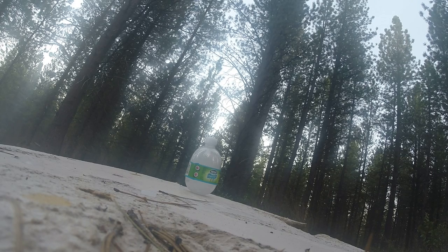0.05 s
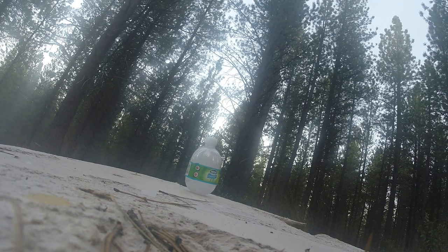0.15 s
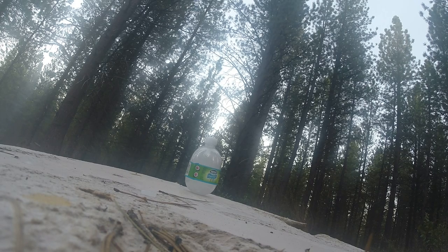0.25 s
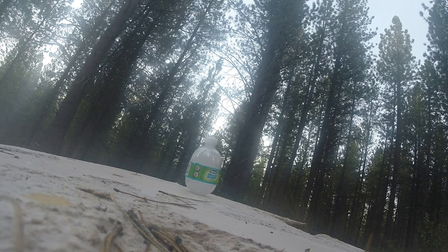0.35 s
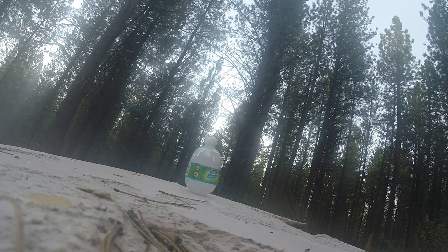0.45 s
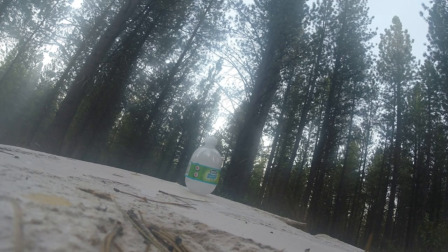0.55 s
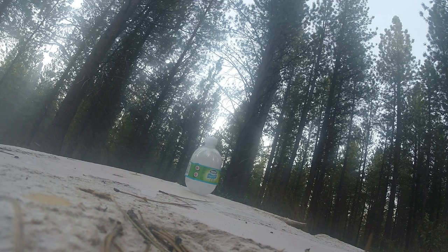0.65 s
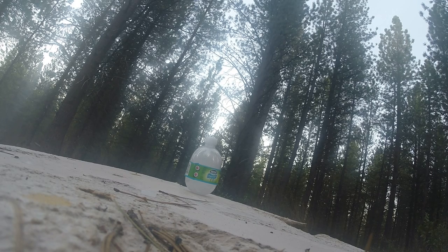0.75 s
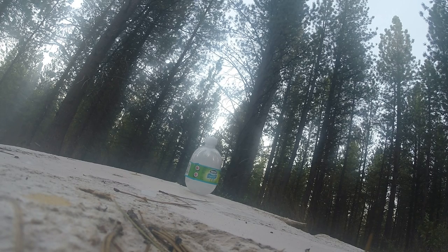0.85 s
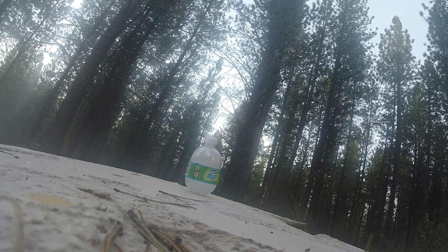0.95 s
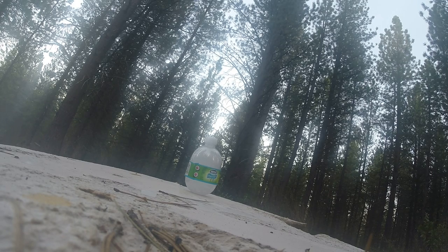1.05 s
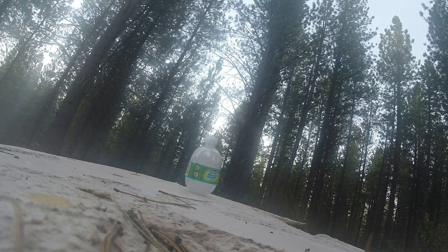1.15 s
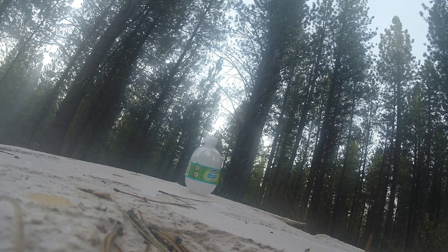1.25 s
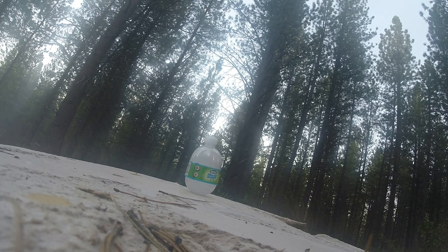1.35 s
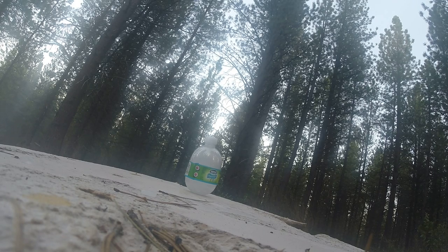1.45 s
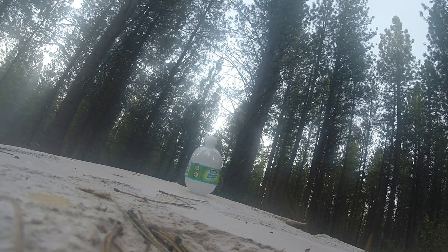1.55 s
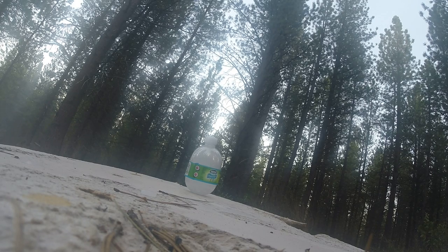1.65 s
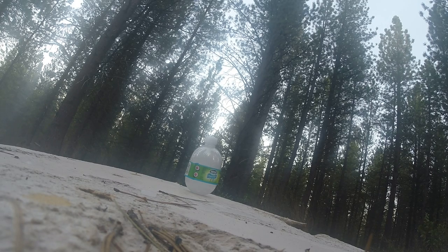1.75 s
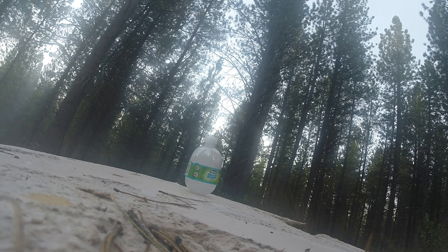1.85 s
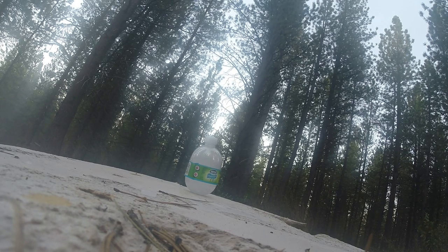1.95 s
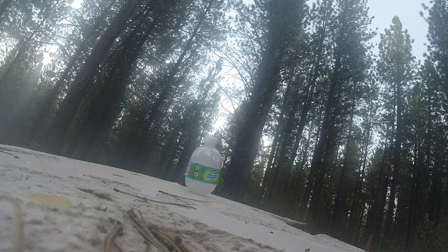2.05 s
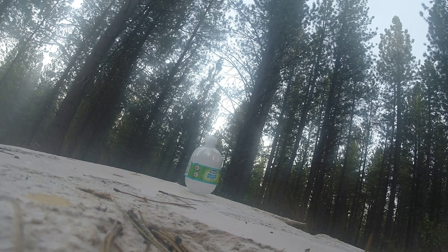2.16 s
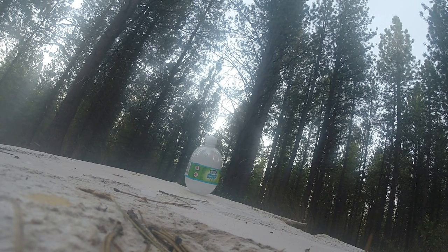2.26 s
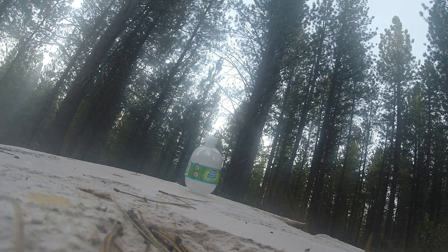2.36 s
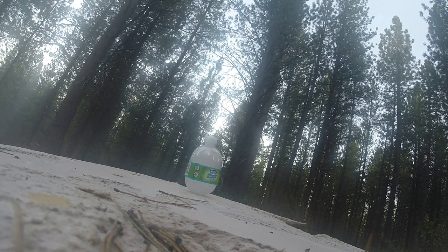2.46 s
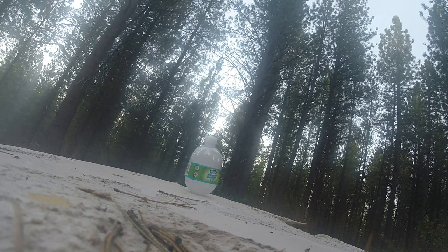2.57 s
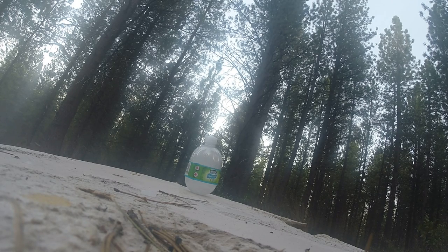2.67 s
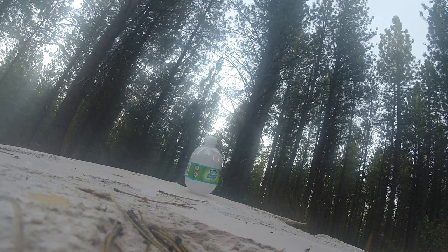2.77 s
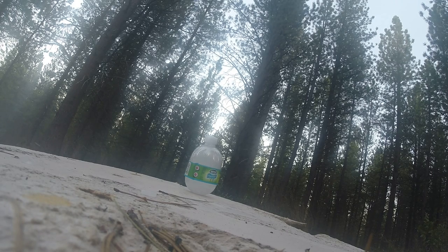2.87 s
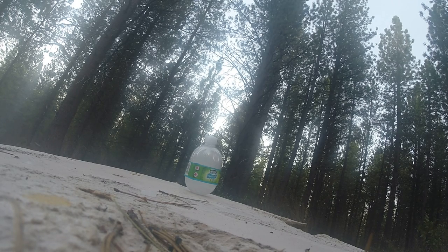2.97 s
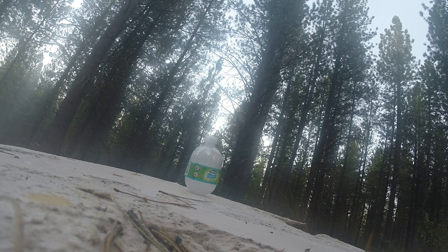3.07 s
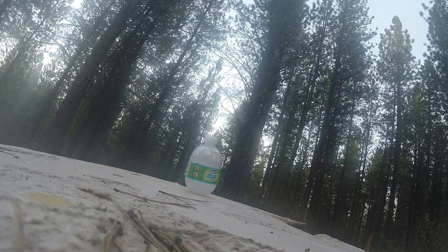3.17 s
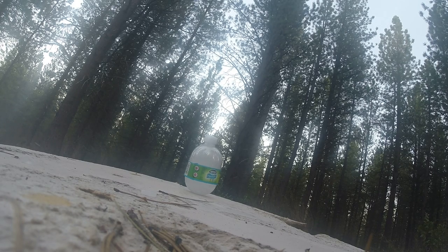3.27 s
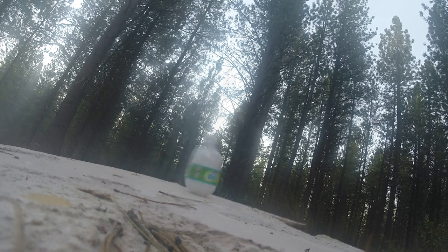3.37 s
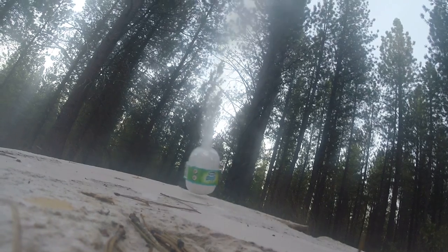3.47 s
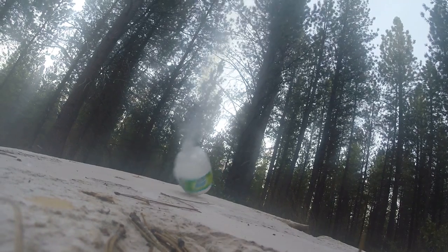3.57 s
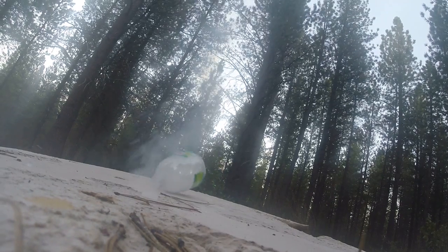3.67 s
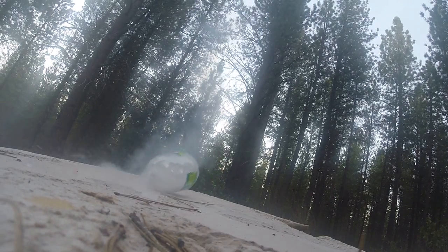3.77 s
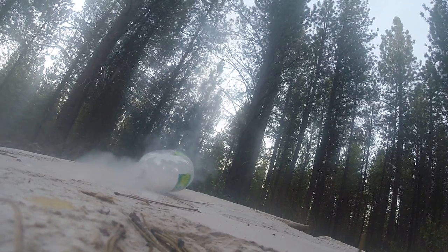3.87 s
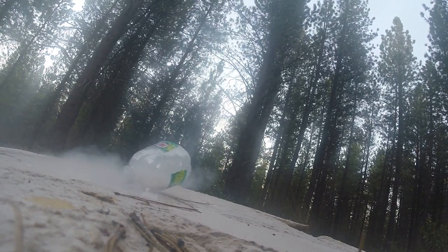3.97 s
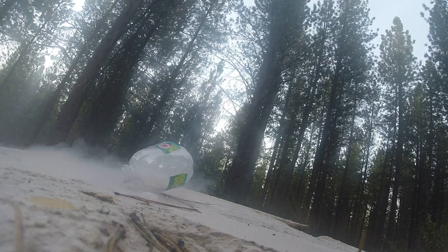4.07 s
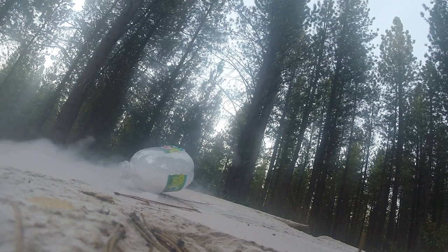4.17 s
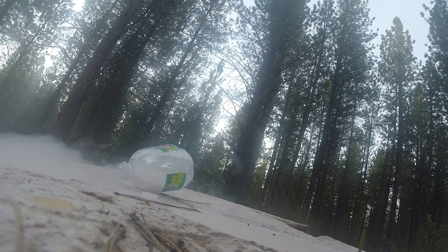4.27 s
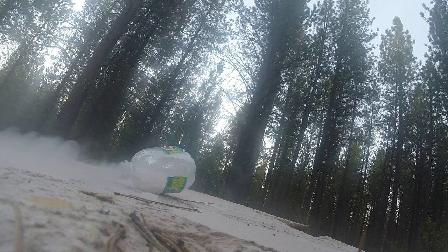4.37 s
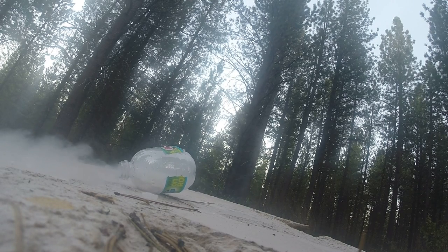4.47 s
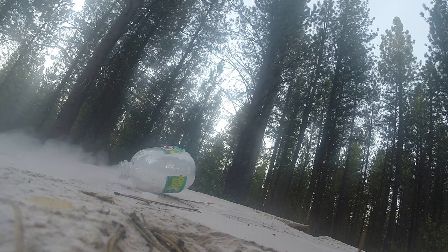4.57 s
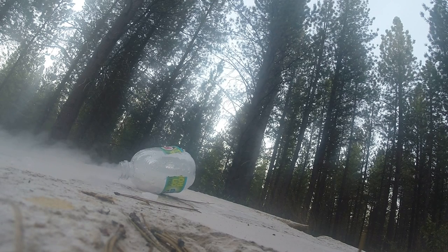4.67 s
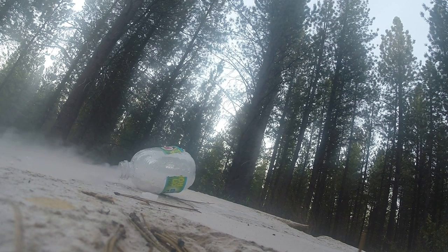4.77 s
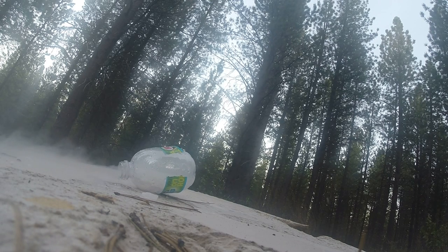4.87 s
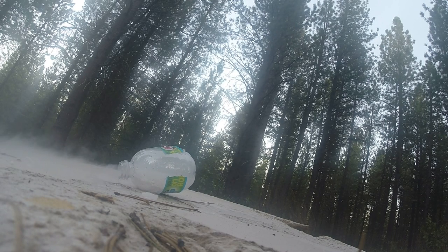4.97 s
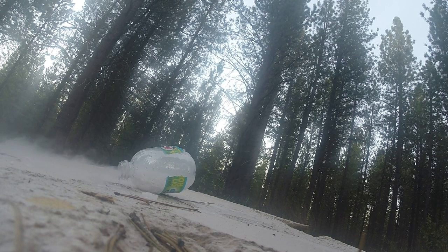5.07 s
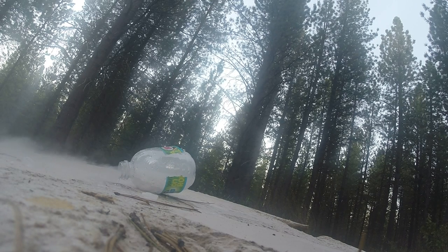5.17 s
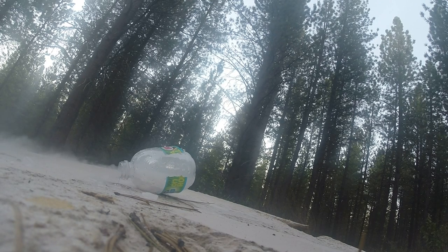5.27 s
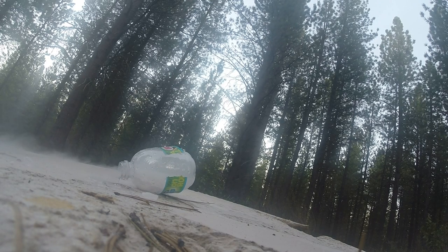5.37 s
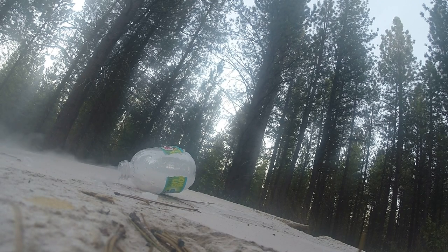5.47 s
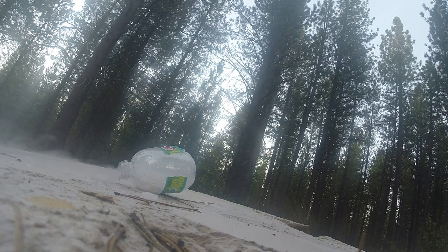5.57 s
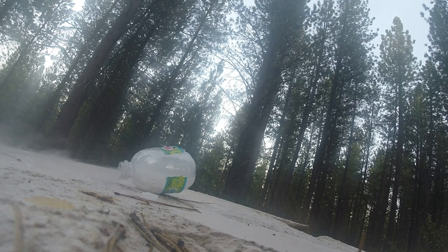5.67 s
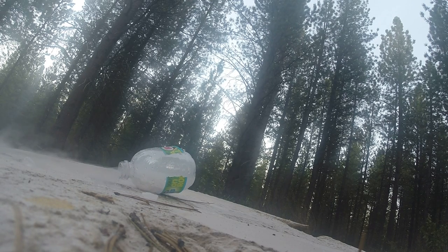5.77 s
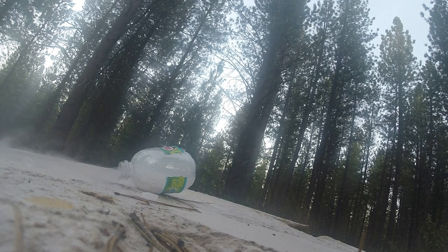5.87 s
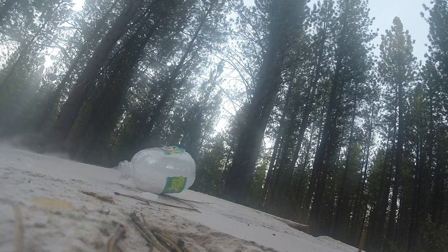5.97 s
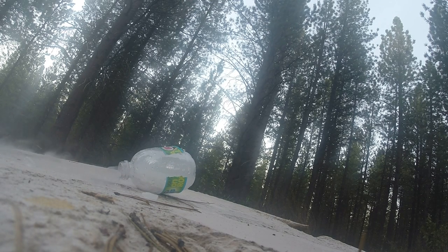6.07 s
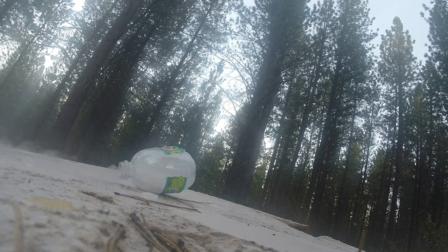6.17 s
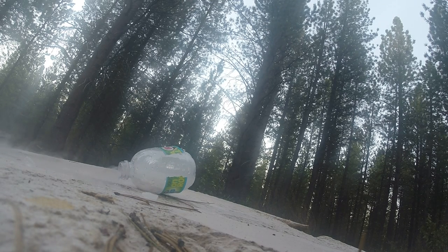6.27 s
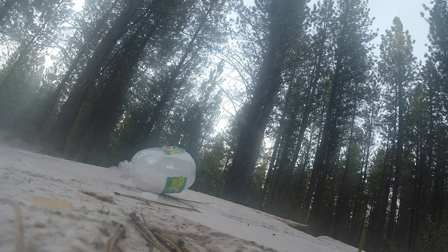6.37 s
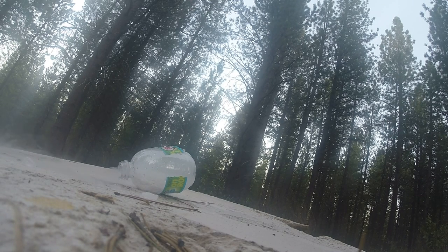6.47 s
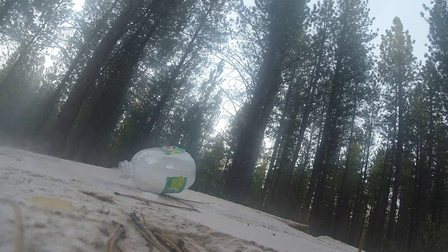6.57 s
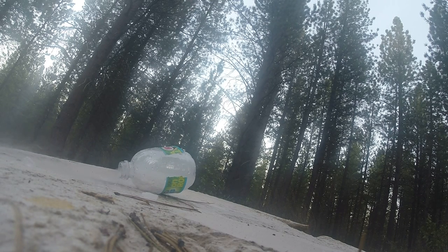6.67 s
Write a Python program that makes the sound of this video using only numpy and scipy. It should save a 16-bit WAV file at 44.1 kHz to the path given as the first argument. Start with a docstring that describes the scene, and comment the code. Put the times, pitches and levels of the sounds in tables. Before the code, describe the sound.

Quiet outdoor air with a very faint high electronic whine and distant single bird whistles. A pressurised bottle cracks and creaks at uneven intervals for over three seconds, then bursts its cap in a clipped bang. A brief roaring gas jet, a low hollow tumble and a lingering forest reverberation follow, with bright plastic snaps, knocks on rock and delicate fizz to the end.

```python
"""In a still pine forest, with a camera's thin whine and a far bird's whistles, a sealed bottle of dry ice stands on rock.
First its stretching wall slips: noise cracks and damped bottle modes. Then the cap blows off: a pressure step, ringing
gas and torn thread overload the microphone, turbulent noise rushes out, and the trees return a decaying noise tail.
The bottle topples and booms by its low modes while plastic knocks on rock as filtered clicks and hollow rings.
Last, the cold wall snaps in bright clicks and notes, and boiling gas fizzes as dense random grains over a fine hiss."""
import sys
import numpy as np
from scipy import signal
from scipy.fft import rfft, irfft
from scipy.io import wavfile
from scipy.ndimage import uniform_filter1d

SR = 44100
rng = np.random.default_rng(int(sys.argv[2]) if len(sys.argv) > 2 else 0)


def wav_record(signal):
    """Record a signal, one row per channel, as 16-bit PCM in the file named by sys.argv[1]."""
    frames = np.transpose(np.atleast_2d(signal))
    bounded = np.clip(frames, -1, 1)
    # unit amplitude maps onto the largest positive 16-bit level
    quanta = np.round(bounded * 32767).astype(np.int16)
    wavfile.write(sys.argv[1], SR, quanta)


N = 296352
T = np.arange(N) / SR  # scene time in s
HIT_T = np.arange(16384) / SR  # time since a blow in s
TOP_HZ = 15200  # upper limit of the microphone


def undb(db):
    """Decibels to amplitude gain."""
    return 10 ** (np.asarray(db) / 20)


def unit(x):
    """Normalise power: scale to rms 1."""
    return x / np.sqrt(np.mean(x ** 2))


def unit_hit(x):
    """Normalise energy: scale to that of 10 ms at rms 1."""
    return x / np.sqrt(np.sum(x ** 2) / (SR / 100))


def at_hz(points, hz):
    """Interpolate (Hz, value) points on a log-frequency axis."""
    f, value = np.transpose(points)
    return np.interp(np.log(hz + 1e-9), np.log(f), value)


def colour(x, points):
    """Spectral shaping: filter by (Hz, dB) points, falling away beyond both ends; rms 1."""
    hz = np.fft.rfftfreq(len(x), 1 / SR) + 1e-3
    low_skirt = np.minimum(hz / points[0][0], 1) ** 2
    high_skirt = np.minimum(points[-1][0] / hz, 1) ** 2
    gain = undb(at_hz(points, hz)) * low_skirt * high_skirt
    return unit(irfft(rfft(x) * gain, len(x)))


def bandpass(x, low_hz, high_hz):
    """Causal Butterworth band-pass."""
    edges = [low_hz, min(high_hz, .45 * SR)]
    return signal.sosfilt(signal.butter(2, edges, "band", fs=SR, output="sos"), x)


def decay(t, t60):
    """Exponential damping: 60 dB down after t60 seconds."""
    return np.exp(-np.log(1000) * t / t60)


def fading(x, t60_at):
    """Frequency-dependent damping: each octave of x dies away at its own rate."""
    t, spectrum = np.arange(len(x)) / SR, rfft(x)
    octave = np.clip(np.log2(np.fft.rfftfreq(len(x), 1 / SR) + 1), 7, 14)
    out = 0
    for k in range(7, 15):  # overlapping bands centred on 2^k Hz
        band = irfft(spectrum * np.maximum(1 - abs(octave - k), 0), len(x))
        out = out + band * decay(t, t60_at(2. ** k))
    return out


def ring(modes, detune, scatter_db=0):
    """Modal synthesis: a sum of damped sines, slightly different at each blow."""
    out = 0
    for hz, db, t60 in modes:
        sharp, louder = rng.standard_normal(2)
        gain = undb(db + scatter_db * louder)
        tone = np.sin(2 * np.pi * hz * (1 + detune * sharp) * HIT_T)
        out = out + gain * tone * decay(HIT_T, t60)
    return out


def crack(points, t60, damping, treble_db=0):
    """High modal density: coloured noise, t60 set at 2 kHz, with high frequencies dying first."""
    # the treble gain grows from 3.5 kHz to its full value at 7 kHz
    tilted = [(hz, db + treble_db * np.clip(np.log2(hz / 3500), 0, 1)) for hz, db in points]
    noise = colour(rng.standard_normal(len(HIT_T)), tilted)
    return unit_hit(fading(noise, lambda hz: t60 * (2000 / hz) ** damping))


def walk(rate):
    """Random modulation: smoothed steps, rate per second, with a spread near 1."""
    k = int(SR / rate)
    steps = np.repeat(rng.standard_normal(N // k + 1), k)
    return unit(uniform_filter1d(steps, k)[:N])


def swell(t, peak_s, rise_db_per_s, fall_db_per_s):
    """Piecewise exponential envelope: linear in dB on each side of 0 dB at peak_s."""
    return np.where(t < peak_s, (t - peak_s) * rise_db_per_s, (peak_s - t) * fall_db_per_s)


def add(out, s, x):
    """Superposition: mix x into out from time s on."""
    i = int(s * SR)
    out[i:i + len(x)] += x[:N - i]


# Spectrum of the forest air. Each row: frequency in Hz, relative level in dB.
AIR_SPECTRUM = [(12, -38), (20, -7.5), (49, -1.5), (158, -5), (337, -11), (376, -9.5), (409, -10.5),
                (779, -15), (847, -14.5), (947, -17), (1610, -20), (4930, -27), (8380, -33.5), (13900, -41),
                (15900, -42.5)]
AIR_DB = -57
WHINE_HZ, WHINE_DB = 13908, -81.5


def background(waver_db=.2):
    """Stationary noise and a tone: still forest air and the camera's thin, slightly wandering whine."""
    air = colour(rng.standard_normal(N), AIR_SPECTRUM) * undb(AIR_DB + waver_db * walk(3.8))
    whine_hz = WHINE_HZ + 8 * walk(40)
    return air + undb(WHINE_DB) * np.sin(2 * np.pi * np.cumsum(whine_hz) / SR)


# A far bird's whistles. Each row: start in seconds, starting frequency in Hz, peak level in dB.
WHISTLES = [(1.11, 2745, -62), (2.19, 2760, -61), (3.36, 2770, -58), (4.585, 2825, -60), (5.76, 2810, -62)]
WHISTLE_S, WHISTLE_SAG_HZ = .078, 40


def bird():
    """Frequency modulation: soft, nearly pure tones whose pitch sags toward the end."""
    out = np.zeros(N)
    u = np.linspace(0, 1, int(WHISTLE_S * SR))
    envelope = np.sqrt(abs(np.sin(np.pi * u)))
    for s, start_hz, db in WHISTLES:
        hz = start_hz - WHISTLE_SAG_HZ * u ** 2
        add(out, s, undb(db) * np.sin(2 * np.pi * np.cumsum(hz) / SR) * envelope)
    return out


POP_S = 3.4523  # the cap lets go: echo, jet and pop all start here
# Spectrum the trees send back. Each row: frequency in Hz, relative level in dB.
ECHO_SPECTRUM = [(180, -46.5), (300, -33.5), (410, -12), (447, -9.5), (586, -7.5), (675, -10), (885, -7.5),
                 (1460, -20), (1880, -13.5), (2430, -27), (2840, -18), (3670, -16.5), (4950, -30),
                 (7070, -36), (9000, -45), (11700, -69), (19800, -120)]
# Reverberation times of the forest. Each row: frequency in Hz, t60 in seconds.
ECHO_T60 = [(300, 2.9), (600, 1.63), (1000, 5.17), (2000, 3), (4000, 1.3), (9000, 3.1)]


def forest_echo(db=-33, rise_s=0.29):
    """Diffuse scattering: countless trunks return the blast; air and ground leave the middle longest."""
    tail = fading(colour(rng.standard_normal(N), ECHO_SPECTRUM), lambda hz: at_hz(ECHO_T60, hz))
    build_up = 1 - np.exp(-(T / rise_s) ** 2)
    out = np.zeros(N)
    add(out, POP_S, tail * build_up * undb(db + .5 * walk(70.2)))
    return out


# Boiling of the dry ice. Each row: time in seconds, boiling level in dB (fizz and snaps add offsets).
BOILING = [(3.9, -67), (4.14, -66.5), (4.6, -70.5), (4.87, -59), (5.01, -67.5), (5.98, -60.5), (6.5, -69),
           (6.7, -72)]
BOIL_START_S, BOIL_ATTACK_S = 4.2, 0.49


def fizz_db(t):
    """Interpolated envelope: level of the boiling at time t."""
    return np.interp(t, *np.transpose(BOILING))


# Spectrum of the fizzing gas. Each row: frequency in Hz, relative level in dB.
FIZZ_SPECTRUM = [(700, 9), (1500, -1.5), (2800, -5), (6000, -9.5), (9000, -12), (13000, -22),
                 (16000, -16.5)]


def fizz(db=3, per_s=100, spread_db=5.0, tail_s=0.00061, hiss_db=-4):
    """Shot noise: tiny gas bursts in five pitch ranges, many faint and a few stronger, over a fine hiss."""
    grains = 0
    for hz in np.geomspace(2000, 11000, num=5):
        size = np.minimum(rng.exponential(size=N), 5)
        bursts = (rng.random(N) < per_s / SR) * undb(spread_db * size) * rng.choice([-1, 1], N)
        puff = rng.standard_normal(len(HIT_T)) * np.exp(-HIT_T / tail_s)
        smear = unit_hit(bandpass(puff, hz / 1.56, hz * 1.67))
        grains = grains + np.sqrt(hz) * signal.fftconvolve(bursts, smear)[:N]
    gas = colour(unit(grains) + undb(hiss_db) * rng.standard_normal(N), FIZZ_SPECTRUM)
    attack = np.clip((T - BOIL_START_S) / BOIL_ATTACK_S, 0, 1)
    return gas * undb(fizz_db(T) + db) * attack


# Spectrum of a snap's click. Each row: frequency in Hz, relative level in dB.
SNAP_SPECTRUM = [(180, -75), (300, -2), (993, 1.5), (1580, -8), (2740, 3), (3290, -5), (3880, 1),
                 (4980, -3.5), (5980, 7), (7800, -1.5), (8480, -2.5), (10700, -17.5), (14000, -16.5),
                 (15200, -22), (15900, -51.5)]
SNAP_T60_S, NOTE_T60_S = 0.015, 0.014


def snap(hz, treble_db, ring_db=-4, edge_db=-13, edge_t60_s=.005):
    """Sudden buckling of the cold wall: a bright edge, a click and a brief note of its own."""
    edge_noise = rng.standard_normal(len(HIT_T)) * decay(HIT_T, edge_t60_s)
    edge = unit_hit(bandpass(edge_noise, 10800, 16700))
    click = bandpass(crack(SNAP_SPECTRUM, SNAP_T60_S, 0.55, treble_db), 1060, 11800)
    note = unit_hit(ring([(hz, 0, NOTE_T60_S)], 0.005) * (1 - np.exp(-HIT_T / 0.0001)))
    return undb(edge_db + treble_db) * edge + click + undb(ring_db) * note


FAINT_PER_S, FAINT_OVER_FIZZ_DB, FAINT_SPREAD_DB, FAINT_TREBLE_DB = 22, 7, 5.5, -6
FAINT_LOW_HZ, FAINT_HIGH_HZ = 2220, 6640


def faint_crackles():
    """Random point process: small snaps at chance times and pitches, stronger while the boiling is hard."""
    out = np.zeros(N)
    span = T[-1] - BOIL_START_S
    for when, pitch, size in rng.random((int(FAINT_PER_S * span), 3)):
        s = BOIL_START_S + when * span
        db = fizz_db(s) + FAINT_OVER_FIZZ_DB + FAINT_SPREAD_DB * (2 * size - 1)
        hz = FAINT_LOW_HZ * (FAINT_HIGH_HZ / FAINT_LOW_HZ) ** pitch
        add(out, s, undb(db) * snap(hz, FAINT_TREBLE_DB))
    return out


# The loudest snaps of the cold, slack plastic. Each row: start in seconds, level in dB,
# note frequency in Hz, treble level in dB (crackles() offsets both levels).
CRACKLES = [(3.855, -40, 2270, -66), (4.0117, -48, 2500, -61), (4.0842, -41, 3800, -62),
            (4.152, -39.5, 3360, -72), (4.6558, -28.5, 2330, -49), (4.6746, -27, 3030, -58),
            (4.7144, -37.5, 3220, -50), (4.8224, -19, 3950, -34), (4.87, -28.5, 5430, -45.5),
            (4.903, -43, 2390, -69), (5.0663, -38.5, 5300, -65), (5.1282, -39, 2590, -71),
            (5.1692, -33, 2350, -72), (5.2042, -36.5, 2280, -70), (5.2277, -34.5, 2870, -65),
            (5.2819, -30.5, 2780, -60), (5.3178, -39, 2400, -64), (5.3562, -38, 2420, -62),
            (5.5294, -37, 2640, -61), (5.5626, -33.5, 2600, -55), (5.5823, -27.5, 2220, -74),
            (5.5978, -33, 2770, -60), (5.8032, -35, 2900, -45), (5.9787, -17.5, 3650, -23),
            (6.1388, -38.5, 2930, -43.5), (6.1641, -32, 2190, -64), (6.4077, -41.5, 2860, -72),
            (6.564, -37, 3250, -68), (6.627, -32.5, 6350, -48.5)]
# each crease gives way in two steps, the second weaker and a few ms later
SECOND_STEP_DB, SECOND_STEP_S = -14, .003


def crackles(crack_db=-10, bright_db=15):
    """Stepwise buckling: loud snaps of the cooling wall, each followed by a smaller one."""
    out = np.zeros(N)
    for s, db, hz, treble in CRACKLES:
        tilt_db = min(treble - db + bright_db, 0)
        add(out, s, undb(db + crack_db) * snap(hz, tilt_db))
        second_s = s + SECOND_STEP_S * (.5 + rng.random())
        add(out, second_s, undb(db + crack_db + SECOND_STEP_DB) * snap(hz, tilt_db))
    return out


# Blunt knocks on the rock. Each row: start in seconds, level in dB, lowest and highest frequency
# in Hz, click t60 at 2 kHz in seconds, ring level relative to the click in dB.
KNOCKS = [(3.783, -36.5, 150, 695, 0.049, -21), (5.0324, -39.5, 110, 6200, 0.0033, -30.5),
          (6.2907, -31.5, 466, 9000, 0.041, 7.5), (6.2916, -20, 643, 9100, 0.025, -12.5)]
# Spectrum of a knock's click. Each row: frequency in Hz, relative level in dB.
KNOCK_SPECTRUM = [(150, -3.5), (950, 4.5), (1400, -17), (1800, -0.5), (2500, -10), (3400, -9.5), (4500, -3),
                  (6000, 3.5), (8800, 5), (10500, -6.5)]
# Modes a knock rings with. Each row: frequency in Hz, relative level in dB, t60 in seconds.
KNOCK_MODES = [(213, 0.5, 0.066), (520, -21, 0.08), (613, -6, 0.035), (704, 3.5, 0.053), (816, -6, 0.065),
               (910, 2.5, 0.028), (958, 4.5, 0.052), (1050, -20, .03), (1770, 10, 0.027),
               (2485, 6.5, 0.024), (4430, 0, 0.03)]


def knocks():
    """Impact excitation: plastic strikes rock with a broad click and a hollow modal ring."""
    out = np.zeros(N)
    for s, db, low_hz, high_hz, t60, ring_db in KNOCKS:
        contact = bandpass(crack(KNOCK_SPECTRUM, t60, 0.82), low_hz, high_hz)
        click = unit_hit(bandpass(contact, low_hz, TOP_HZ))
        struck = ring(KNOCK_MODES, 0.0084) * (1 - np.exp(-HIT_T / 0.0011))
        hollow = unit_hit(bandpass(struck, 365, 4800))
        add(out, s, undb(db) * (click + undb(ring_db) * hollow))
    return out


# Modes of the taut bottle. Each row: frequency in Hz, relative level in dB, t60 in seconds.
BOTTLE_MODES = [(161.4, 3, 0.31), (167, -11.5, 0.24), (210, -2.5, 0.33), (344, -11, 0.11), (398, -11, 0.12),
                (491, -5.5, 0.082), (545, -0.5, 0.079), (604, -2, 0.049), (685, -0.5, 0.069),
                (776.5, 4, 0.068), (828.6, -4, 0.075), (912, 2.5, 0.026), (920, -3, 0.02),
                (1020, -6, 0.014), (1173, -8, 0.033), (1210, -3, 0.028), (1330, -18, 0.011),
                (1610, -2, 0.012), (2270, -29, 0.033), (3140, 0.5, 0.029)]
TOPPLE_S, TOPPLE_DB, TOPPLE_BUILD_S = 3.79, -34.5, .012
TOPPLE_RING_SHARE = 0.72  # the rock damps it: share of the free ring time


def topple(tilt_db=-5, detune=.04):
    """Soft impact: the bottle lands on its side and booms once, mainly in its lowest modes."""
    lowest_hz = BOTTLE_MODES[0][0]
    modes = [(hz, db + tilt_db * np.log2(hz / lowest_hz), t60 * TOPPLE_RING_SHARE)
             for hz, db, t60 in BOTTLE_MODES]
    out = np.zeros(N)
    build_up = 1 - np.exp(-HIT_T / TOPPLE_BUILD_S)
    add(out, TOPPLE_S, undb(TOPPLE_DB) * ring(modes, detune) * build_up)
    return out


# Slips of the stretching wall. Each row: start in seconds, crack level in dB, whole-bottle boom
# level in dB, wall ring level in dB (ticks() adds an offset to each level).
TICKS = [(0.2124, -53, -58, -48.5), (0.386, -30, -42, -35.5), (0.7546, -47.5, -61, -49),
         (1.0015, -46, -56, -50), (1.037, -22, -36.5, -26.5), (1.2377, -46.5, -60, -60),
         (1.3466, -45, -53.5, -44), (1.8183, -43, -55, -46), (2.0824, -26.5, -47, -38),
         (2.144, -28, -33.5, -36), (2.2191, -31.5, -74, -31), (2.8163, -29.5, -47, -40),
         (2.9454, -26, -42, -55), (3.2644, -43.5, -59, -44), (3.3688, -38.5, -57, -48)]
# Spectrum of a slip's crack. Each row: frequency in Hz, relative level in dB.
TICK_SPECTRUM = [(290, -4), (500, -16.5), (668, -7.5), (1140, 2), (1380, -4), (1570, 0), (1920, -14),
                 (2130, 3), (2890, -7.5), (3480, 3), (4080, -5.5), (9330, -7), (15900, -43)]
# strong slips are duller: treble at the reference level, and treble lost per dB above it
SLIP_REF_DB, SLIP_TREBLE_DB, SLIP_DULLING = -38.5, 2, 0.47


def ticks(crack_db=-3, boom_db=0, wall_db=2.5, body_db=-5, rise_s=0.00072, swell_s=0.0057):
    """Stick-slip excitation: each wall slip cracks, rings the wall and sets the bottle booming."""
    out = np.zeros(N)
    for s, db, boom, wall in TICKS:
        blow = [(226, boom + boom_db), (660, wall + wall_db), (950, wall + wall_db), (1150, db + body_db)]
        modes = [(hz, gain + at_hz(blow, hz), t60) for hz, gain, t60 in BOTTLE_MODES]
        # high modes speak at once, low ones build up as the bend spreads round the bottle
        quick = ring([m for m in modes if m[0] > 1050], 0.014, scatter_db=3.0)
        slow = ring([m for m in modes if m[0] <= 1050], 0.011, scatter_db=2.0)
        treble = SLIP_TREBLE_DB - SLIP_DULLING * (db - SLIP_REF_DB)
        slip = undb(db + crack_db) * crack(TICK_SPECTRUM, 0.035, 0.65, treble)
        sharp_onset = (slip + quick) * (1 - np.exp(-HIT_T / rise_s))
        add(out, s, sharp_onset + slow * (1 - np.exp(-HIT_T / swell_s)))
    return out


# Spectrum of the rushing gas. Each row: frequency in Hz, relative level in dB.
JET_SPECTRUM = [(150, -49.5), (250, -13), (358, -16.5), (397, -4.5), (448, -6.5), (652, -0.5), (904, 2.5),
                (1410, -14.5), (1820, -9), (2610, -19), (3160, -13.5), (8820, -36.5), (11800, -51.5),
                (15000, -75.5)]
# Spectrum of the bottle's flutter. Each row: frequency in Hz, relative level in dB.
FLUTTER_SPECTRUM = [(25, -6.5), (70, -8), (105, 2), (170, -2.5), (240, -8), (330, -31)]
# the jet grows as the bottle tips, then runs out of pressure
JET_PEAK_S, JET_DB, JET_RISE_DB_PER_S, JET_FALL_DB_PER_S = 3.63, -34.5, 40, 95
# its low flutter sags from the pop on and collapses once the jet has peaked; level at that peak
FLUTTER_DB, FLUTTER_SAG_DB_PER_S, FLUTTER_FALL_DB_PER_S = -38.5, 34, 173


def jet(attack_s=.008, gust_db=2.0, gusts_per_s=60):
    """Turbulent jet noise: gas rushes from the neck while the recoiling bottle flutters."""
    rush = JET_DB + swell(T, JET_PEAK_S, JET_RISE_DB_PER_S, JET_FALL_DB_PER_S)
    flutter = FLUTTER_DB + swell(T, JET_PEAK_S, -FLUTTER_SAG_DB_PER_S, FLUTTER_FALL_DB_PER_S)
    hiss = colour(rng.standard_normal(N), JET_SPECTRUM) * undb(rush + gust_db * walk(gusts_per_s))
    low = colour(rng.standard_normal(N), FLUTTER_SPECTRUM) * undb(flutter + gust_db * walk(gusts_per_s))
    return np.clip((T - POP_S) / attack_s, 0, 1) * (hiss + low)


# Modes of gas and wall set swinging by the blast. Each row: frequency in Hz, relative level in dB,
# t60 in seconds.
POP_MODES = [(165, 16, 0.01), (354, 19.5, 0.0097), (422.5, 9, 0.02), (729, 21, 0.012), (1014, 22, 0.0097),
             (1303, 16, 0.0095), (2190, 14, 0.0054)]
POP_DB = 0.5  # gain of the pressure step and the ringing
# Spectra of tearing thread and rock scatter. Each row: frequency in Hz, relative level in dB.
RIP_SPECTRUM = [(1000, -5.5), (2500, -3.5), (5000, 3.5), (9000, -6.5), (15000, -26.5)]
NEAR_SPECTRUM = [(50, -11.0), (130, -1.5), (230, 2.0), (320, -4.5), (450, 0.5), (750, 1.5), (1300, -12.5),
                 (2300, -12.5), (3500, -15.0), (5000, -24.5), (9000, -35.5)]


def pop(push_s=0.0049, push_db=0, rise_s=0.000572, rip_db=-19, near_db=-19):
    """Blast wave: a pressure step with suction behind it, the ringing bottle, torn thread and rock scatter."""
    shock = (1 - HIT_T / push_s) * np.exp(-HIT_T / push_s)
    swinging = ring(POP_MODES, 0.0026) + undb(push_db) * shock
    blast = -undb(POP_DB) * swinging * (1 - np.exp(-HIT_T / rise_s))
    rip = undb(rip_db) * crack(RIP_SPECTRUM, .028, 0.23)
    near = undb(near_db) * crack(NEAR_SPECTRUM, 0.18, .12)
    out = np.zeros(N)
    add(out, POP_S, blast + rip + near)
    return out


def scene():
    """Linear superposition: every source summed at one microphone."""
    burst = pop() + jet() + forest_echo() + topple()
    afterwards = crackles() + faint_crackles() + knocks() + fizz()
    return (ticks() + burst + afterwards + bird() + background())[None]


def record(dry):
    """Saturation and band limiting: the blast clips flat with slightly round corners; the top is cut."""
    clipped = dry / (1 + dry ** 6) ** (1 / 6)
    return signal.sosfilt(signal.ellip(8, .1, 70, TOP_HZ, fs=SR, output="sos"), clipped)


dry = scene()
out = record(dry)
wav_record(out)
```